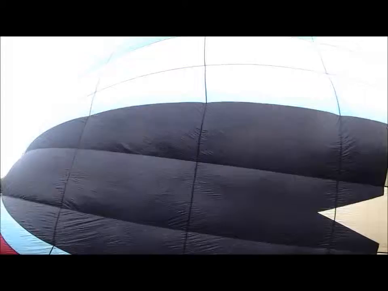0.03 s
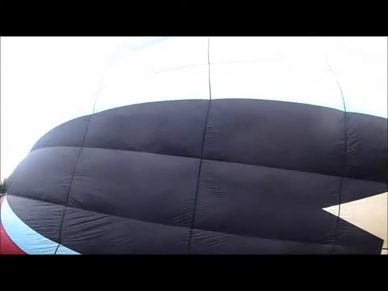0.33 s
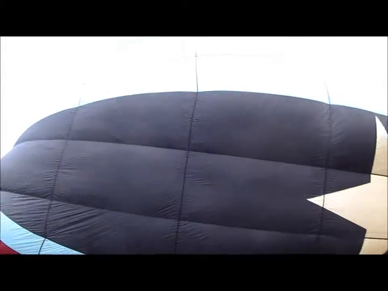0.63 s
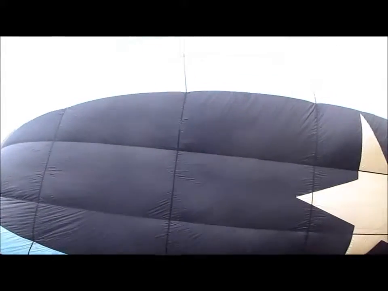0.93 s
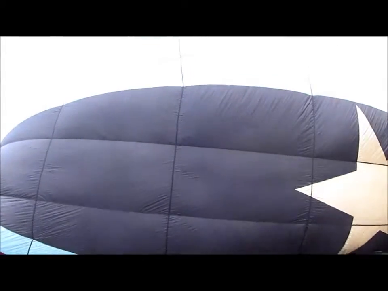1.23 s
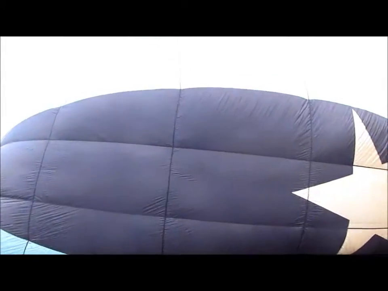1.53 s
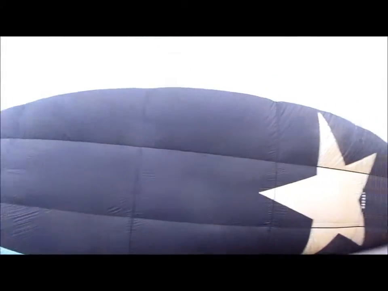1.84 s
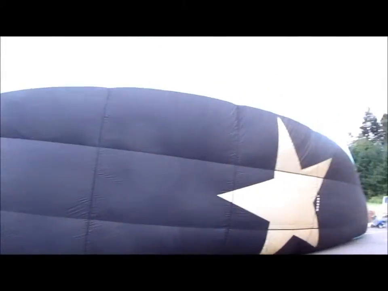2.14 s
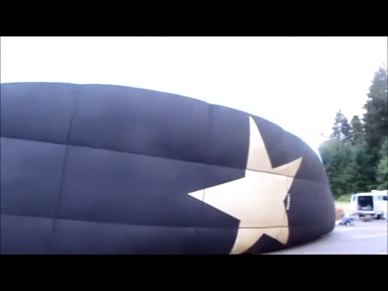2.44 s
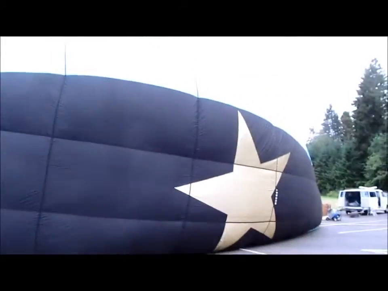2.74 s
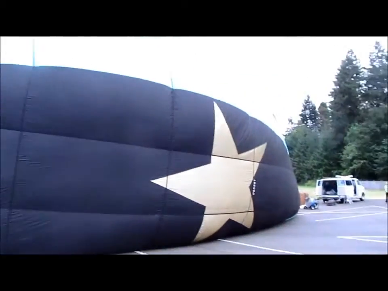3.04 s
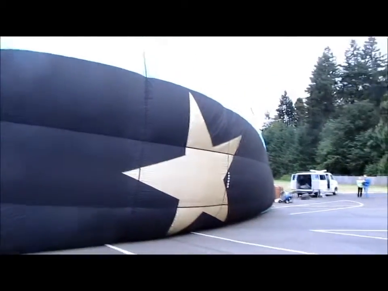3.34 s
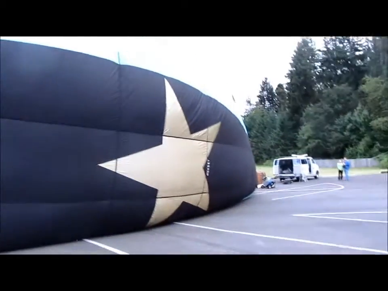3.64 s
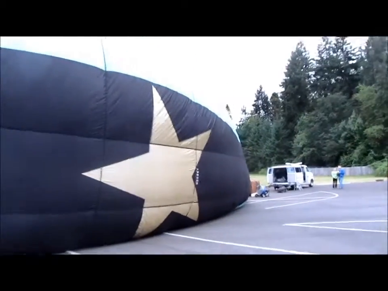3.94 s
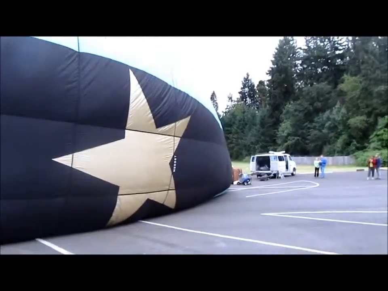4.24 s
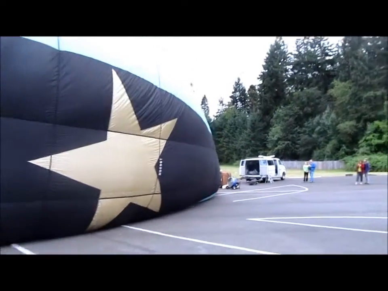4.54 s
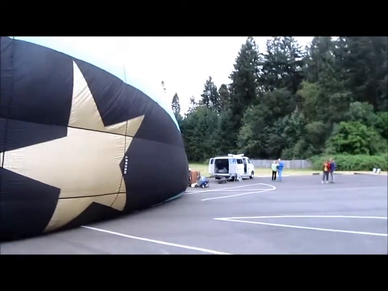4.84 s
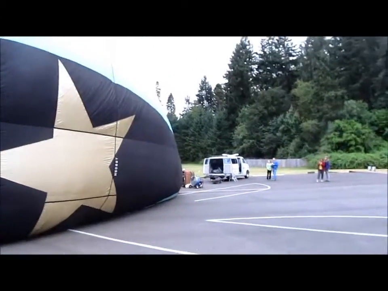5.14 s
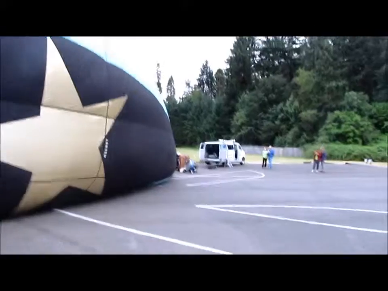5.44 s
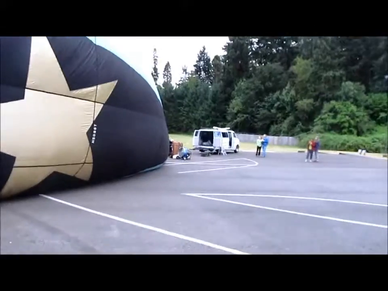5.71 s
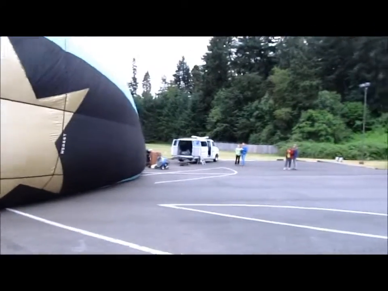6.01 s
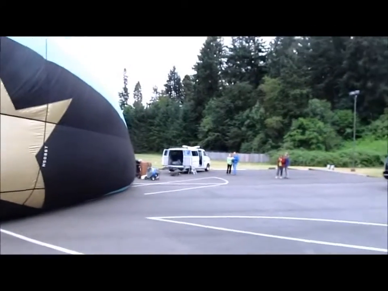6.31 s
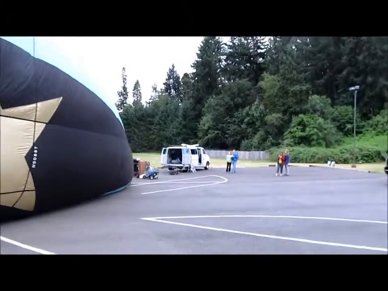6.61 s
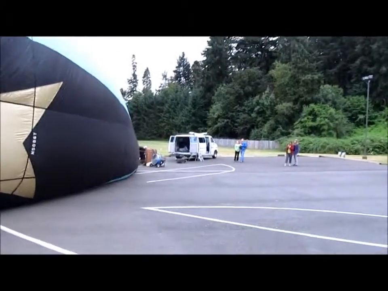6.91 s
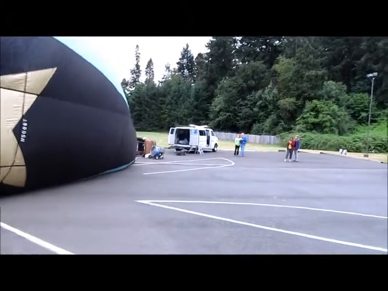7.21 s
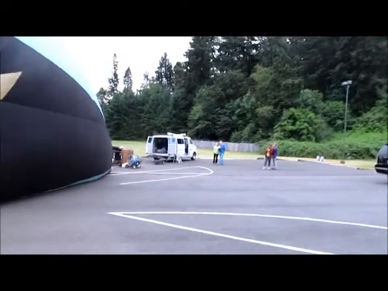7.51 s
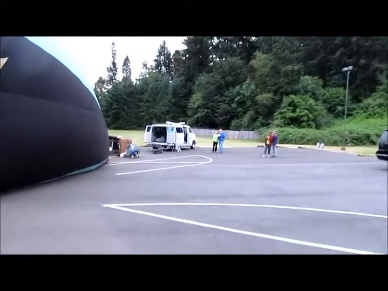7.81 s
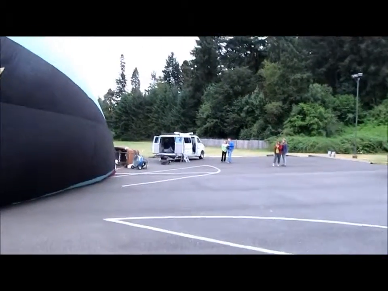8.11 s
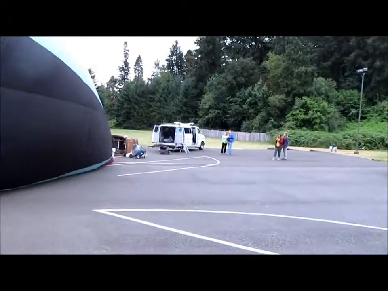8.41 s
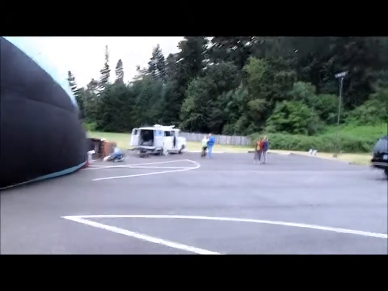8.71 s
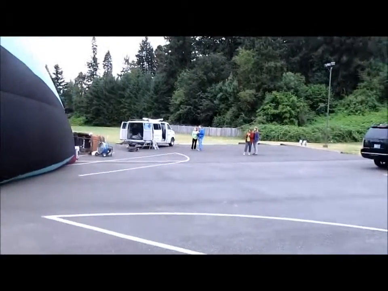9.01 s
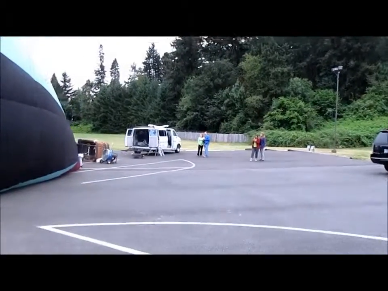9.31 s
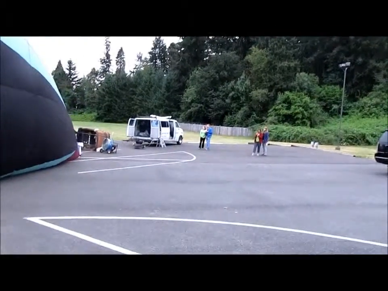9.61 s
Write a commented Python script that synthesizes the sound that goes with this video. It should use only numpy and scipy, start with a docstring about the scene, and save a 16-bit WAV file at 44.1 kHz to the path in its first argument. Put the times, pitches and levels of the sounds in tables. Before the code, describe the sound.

A petrol-driven fan fades in and roars steadily across a paved lot, with a thin whine and light engine clatter.

```python
"""A paved lot, some way off from a petrol-driven fan blowing cold air into a balloon on the ground.
The blades roar, a thin whine rides on top, and the one-cylinder four-stroke engine drones and clatters.
Another motor's hum sinks toward the engine's own, so their fast flutter slows to a deep throb.
The sound fades in while the stereo microphone turns: the fan moves from the shaded right to the open
left, and the echo off the pavement colours it."""
import sys
import numpy as np
from scipy import signal
from scipy.fft import rfft, irfft, next_fast_len
from scipy.io import wavfile

SR = 44100
rng = np.random.default_rng(int(sys.argv[2]) if len(sys.argv) > 2 else 0)


def digitize_waveform(pressure):
    """Quantize a signal to 16-bit integers and store it at the path in sys.argv[1].

    Rows of a 2-D input are taken as channels; values are limited to [-1, 1].
    """
    field = np.atleast_2d(pressure).T
    bounded = np.clip(field, -1, 1)
    quanta = np.round(bounded * 32767).astype(np.int16)
    wavfile.write(sys.argv[1], SR, quanta)


N = 429975
TIME_S = np.arange(N) / SR
FIRING_HZ = 24.06


def from_db(db):
    """Decibels to gain."""
    return 10 ** (np.asarray(db) / 20)


def rms_one(x):
    """Scale to unit power."""
    return x / np.sqrt(np.mean(x ** 2) + 1e-20)


def at_hz(points, hz):
    """Every column of a spectrum, joined on a log-frequency axis."""
    knots, *columns = np.transpose(points)
    return [np.interp(np.log(hz + 1), np.log(knots), column) for column in columns]


def at_time(points, time_s):
    """Every column of a timeline, joined by straight lines."""
    knots, *columns = np.transpose(points)
    return [np.interp(time_s, knots, column) for column in columns]


def drift(rate_hz):
    """A random wander of spread 1, changing about rate_hz times a second."""
    step, settle = 40, 2000
    pole = np.exp(-2 * np.pi * step * rate_hz / SR)
    noise = rng.standard_normal(N // step + settle + 2)
    slow = signal.lfilter([1], [1, -2 * pole, pole * pole], noise)[settle:]
    return np.interp(np.arange(N) / step, np.arange(len(slow)), rms_one(slow))


def resonate(x, hz, width_hz):
    """One resonance with gain 1 at its peak."""
    radius = np.exp(-np.pi * width_hz / SR)
    feedback = [1, -2 * radius * np.cos(2 * np.pi * hz / SR), radius ** 2]
    return signal.lfilter(np.array([1, 0, -1]) * (1 - radius ** 2) / 2, feedback, x)


def turbulence(spectrum):
    """Coloured stereo noise of rms 1; scattered sound sets the two channels apart."""
    # likeness of left and right: frequency_hz, likeness_ratio
    likeness = [(30, .35), (75, 0.87), (140, 0.97), (400, 0.98), (700, 1), (1300, 0.94), (2200, 0.69),
                (4000, 0.66), (9000, 1), (14000, 1)]
    size = next_fast_len(N)
    hz = np.arange(size // 2 + 1) * SR / size
    mid, side = rfft(rng.standard_normal((2, size)))
    alike = np.clip(at_hz(likeness, hz)[0], 0, 1)
    stereo = np.sqrt(1 + alike) * mid + np.sqrt(1 - alike) * side * [[1], [-1]]
    return rms_one(irfft(stereo * from_db(at_hz(spectrum, hz)[0]), size)[:, :N])


def partials(turns, harmonics, scatter_rad, waver_db):
    """Harmonics of a rotation, loosely in step, each wavering in the moving air."""
    out = np.zeros(N)
    for order, level_db in harmonics:
        angle = 2 * np.pi * round(order) * turns + scatter_rad * rng.standard_normal()
        out += np.sqrt(2) * from_db(level_db + waver_db * drift(1.23)) * np.cos(angle)
    return out


def fade(start_s=0.071, rise_s=4.4, top_db=0.22, ease_db_per_s=0.2646):
    """Gain over time: the sound fades in, then eases off very slowly."""
    age_s = TIME_S - start_s
    rise = np.clip(age_s / rise_s, 1e-4, 1) ** 0.68
    return rise * from_db(top_db - ease_db_per_s * np.maximum(age_s - rise_s, 0))


def blade_roar(cycle, whine_turns):
    """Torn air rings in the shroud, surges with the inflow and flutters with the shaft and the whine."""
    # air torn by the blades: frequency_hz, density_db
    roar_spectrum = [(25, -39), (60, -29), (110, -20), (250, -7.5), (300, -6.5), (350, -4), (440, -6),
                     (560, -2.5), (700, -0.5), (860, -3.3), (970, -5), (1100, -4), (1240, -4.2), (1400, -6),
                     (1800, -9), (2400, -14.5), (3800, -14.5), (4500, -18.5), (5000, -21), (6200, -25),
                     (9000, -28), (14500, -49)]
    # swells in the moving air: peak_s, length_s, boost_db
    swells = [(5.75, 0.75, 1.35), (6.65, 0.27, 0.8)]
    air = turbulence(roar_spectrum)
    shroud = 0.69 * resonate(air, hz=538, width_hz=26)
    swell_db = sum(boost_db * np.cos(np.pi * np.clip((TIME_S - peak_s) / length_s, -0.5, 0.5)) ** 2
                   for peak_s, length_s, boost_db in swells)
    surge = from_db(swell_db + 0.31 * drift(4.0) + 0.27 * drift(52))
    shaft_turns = 2 * cycle
    flutter = 1 + 0.018 * np.cos(2 * np.pi * shaft_turns) + 0.054 * np.cos(2 * np.pi * whine_turns)
    return from_db(-35.5) * (air + shroud) * surge * flutter


def thin_whine(turns):
    """A nearly steady tone that keeps its own pitch above the engine."""
    # partials of the whine: harmonic_number, level_db
    harmonics = [(1, -54.5), (3, -71), (4, -55.5), (5, -64)]
    return partials(turns, harmonics, scatter_rad=1.7, waver_db=2.5)


def stroke(cycle, start_cycles, rise_s, decay_s, uneven_db):
    """The envelope of one burst per engine cycle, each of its own strength; rms 1."""
    turns = cycle - start_cycles + 2
    age_s = turns % 1 / FIRING_HZ
    strength = from_db(uneven_db * rng.standard_normal(N // 1000))
    return rms_one(strength[turns.astype(int)] * (1 - np.exp(-age_s / rise_s)) * np.exp(-age_s / decay_s))


def exhaust_drone(cycle, lag_cycles=0.04):
    """Exhaust pulses, each just behind the valve tap, merge into a drone."""
    # partials of the firing rate: harmonic_number, level_db
    harmonics = [(2, -75.5), (3, -73.5), (4, -71.5), (6, -58), (7, -58), (8, -63.5), (9, -53.5), (10, -56),
                 (12, -50), (13, -71), (15, -63), (16, -60.5), (19, -57.5), (20, -63), (22, -53), (23, -59),
                 (24, -60.5), (25, -58.5)]
    return partials(cycle - lag_cycles, harmonics, scatter_rad=0.89, waver_db=0.84)


def silencer_puffs(cycle, ring_hz=195.0, width_hz=25.4):
    """Each firing sends a puff of gas ringing through the silencer."""
    gas = rng.standard_normal(N)
    puffs = gas * stroke(cycle, start_cycles=-0.2, rise_s=0.0032, decay_s=0.0088, uneven_db=2.5)
    ring = resonate(resonate(puffs, ring_hz, width_hz), ring_hz, width_hz)   # twice, for steep flanks
    return from_db(-51.0) * rms_one(ring)


def valve_clatter(cycle):
    """Two bright bursts a cycle: the exhaust valve, then the weaker, more uneven inlet valve."""
    # valve gear and cooling fins: frequency_hz, density_db
    clatter_spectrum = [(2500, -21), (4200, -8), (5000, 4), (6200, -3), (9000, -3), (11000, -10.5),
                        (14500, -22)]
    exhaust = stroke(cycle, start_cycles=-0.033, rise_s=0.002, decay_s=0.0088, uneven_db=1.5)
    inlet = stroke(cycle, start_cycles=0.34, rise_s=0.002, decay_s=0.0074, uneven_db=7.0)
    return from_db(-57.0) * turbulence(clatter_spectrum) * (exhaust + 0.27 * inlet)


def casing_rattle(cycle):
    """The engine casing rattles with each firing."""
    # the shaken engine casing: frequency_hz, density_db
    rattle_spectrum = [(500, -45), (1200, -12), (1900, 0.5), (2600, -4), (3700, -1.5), (4600, -11),
                       (6500, -26), (12000, -50)]
    rattle = from_db(-53.5) * turbulence(rattle_spectrum)
    return rattle * stroke(cycle, start_cycles=-0.064, rise_s=0.0022, decay_s=0.023, uneven_db=1.5)


def valve_ticks(cycle, final_db=-42, uneven_db=3, growth_db_per_s=0.9):
    """The valve taps once a cycle, now and then hard; each tap strikes every mode with its own strength."""
    # taps that stand out: time_s, level_db
    hard_taps = [(6.4737, -39), (6.6398, -41), (6.8468, -38), (7.2609, -40), (7.5931, -37), (7.6755, -37),
                 (8.1743, -38), (8.3, -38), (8.3419, -33), (8.4248, -40), (8.5086, -37), (8.8827, -39),
                 (9.0069, -40), (9.0478, -37), (9.0902, -36), (9.1726, -42), (9.4639, -35), (9.5487, -36),
                 (9.5886, -40)]
    # ring of the tapped metal: pitch_hz, level_db, t60_s
    modes = [(4700, -9.5, 0.02), (4900, -6.5, 0.028), (5190, -8.5, .022), (6100, -13.5, .024)]
    tap_at = np.flatnonzero(np.diff(np.floor(cycle)) > 0)
    count = len(tap_at)
    tap_db = final_db + uneven_db * rng.standard_normal(count) + growth_db_per_s * (tap_at - N) / SR
    for time_s, level_db in hard_taps:
        tap_db[np.argmin(abs(tap_at / SR - time_s))] = level_db
    out = np.zeros(N)
    for pitch_hz, mode_db, t60_s in modes:
        strength = from_db(tap_db + mode_db + 1.9 * rng.standard_normal(count))
        taps = np.full(N, 1e-18)
        taps[tap_at] = strength * rng.choice([-1, 1], count)
        radius, angle = from_db(-60 / (t60_s * SR)), 2 * np.pi * pitch_hz / SR
        out += signal.lfilter([0, np.sin(angle)], [1, -2 * radius * np.cos(angle), radius ** 2], taps)
    return out


def engine(cycle):
    """Everything the firings drive, emerging a little later than the roar."""
    exhaust = exhaust_drone(cycle) + silencer_puffs(cycle)
    metal = valve_clatter(cycle) + casing_rattle(cycle) + valve_ticks(cycle)
    return (exhaust + metal) * fade() ** 0.1


def beating_hums(cycle, harmonic=5, cancel_s=8.7):
    """Another motor's hum sinks toward the engine's deep hum, so the beat between them slows."""
    # the other motor on the lot: time_s, above_engine_hum_hz, level_db
    other_motor = [(3.2, 9, -74), (3.9, 8.4, -67), (4.8, 5.57, -67), (6.5, 7.2, -66), (7.1, 6.1, -61),
                   (7.5, 4.5, -61), (7.95, 2.28, -58.5), (8.45, 1.84, -54), (8.7, 1.4, -57.5),
                   (9.15, .75, -56.5), (9.75, 2, -58)]
    above_hz, other_db = at_time(other_motor, TIME_S)
    beats = np.cumsum(above_hz) / SR
    beats -= np.interp(cancel_s, TIME_S, beats)   # the hums are in opposite phase at cancel_s
    turns = harmonic * cycle
    own = from_db(-58) * fade() ** 1.46 * np.cos(2 * np.pi * turns)
    other = from_db(other_db) * fade() * np.cos(2 * np.pi * (turns + beats))
    return np.sqrt(2) * (own - other)


def turning_microphone(sound, shade_lag_ms=0.15, lag_top_hz=11500, shade_width=0.25):
    """The pavement echo combs the sound; turning shades and delays it differently at the two ports."""
    # the turn, shade 1 facing away from the fan and 0 open to it: time_s, shade_ratio, echo_delay_ms
    turn = [(0.202, 0.77, 1.38), (1.6, .72, 1.52), (3.2, 0.39, 1.74), (4.4, 0.22, 1.78), (5.1, 0.078, 1.76),
            (5.9, 0.0043, 1.8), (6.25, 0.019, 1.71), (7.3, -0.08, 1.775), (8, -0.099, 1.7),
            (8.55, -0.12, 1.73), (8.85, -0.2, 1.6), (9.6, -0.18, 1.62)]
    # pavement echo at each port: frequency_hz, left_gain, right_gain
    echo = [(300, 0.37, 0.35), (850, 0.25, 0.35), (1200, 0.15, .22), (1400, .15, 0.59), (1550, .13, 0.65),
            (1700, 0.13, .22), (1920, .08, 0.42), (2220, 0.097, 0.31), (2510, .08, 0.07), (2900, .03, .02)]
    # balance of the ports facing the open lot: frequency_hz, left_minus_right_db
    port_balance = [(400, -0.5), (750, -0.1), (1000, 2), (1250, 2.5), (1450, 2), (1700, 3.5), (1950, -0.5),
                    (2450, -3.5), (3300, 7.5), (4600, 13), (6500, 6), (8500, 3.5), (12000, 0)]
    # phase between those ports: frequency_hz, left_lead_rad
    port_phase = [(100, -0.015), (400, 0.055), (860, 0.42), (1380, 0.46), (1680, -0.17), (2070, -0.09),
                  (2760, 1.2), (3300, 1.23), (5100, -0.4), (7000, -0.56)]
    # change when turned fully away: frequency_hz, left_db, right_db
    shadow = [(80, 0.5, 0.5), (189, -3.5, -4), (342, 3, 1.5), (430, -6, -5), (540, -6, -5.5),
              (784, -1.5, -4), (1110, -3.5, -2.5), (1410, -5.5, -0.3), (1780, -4.5, -4.5), (2560, -5.5, -4),
              (4630, -10.5, -0.5), (5900, -5, 8), (8800, -15, -4), (11700, -3.5, 1.5), (14000, -8, -8)]
    # narrow peaks and dips in the fan's tone that shift as the microphone turns:
    # centre_hz, half_width_hz, left_db, right_db, strongest_shade_ratio, glide_hz_per_shade
    turning_peaks_and_dips = [(436, 22, 0, -1, .78, 0), (1070, 37, 2.5, .9, .61, -84),
                              (1380, 42, 3, -0.5, 0.58, 26), (1440, 40, 0.5, -8, 0.1, 0),
                              (1580, 63, 3.5, -1, 0.84, 467), (1915, 110, 6, -0.5, 0.087, -181),
                              (1900, 93, -8, 1.5, 0.75, 962), (1945, 160, 5.9, 0, .6, -402),
                              (2160, 67, -7, 4, 0.47, 456), (2240, 65, -2, -6.5, 0.66, 700),
                              (2470, 54, -6, -3.5, 0.4, 303), (2520, 220, 10.5, 3, 0.61, 512),
                              (2640, 130, 2, 5.5, 0.31, 92), (2090, 75, -0.5, 2, 0.21, 0),
                              (3500, 166, 0, 0.5, 0.55, -245), (4589, 235, -1, 3, 0.69, 62),
                              (5800, 300, -8.5, 4, 0.31, 317), (5950, 350, 0.5, -3, 0.82, 0),
                              (5070, 400, -3.5, -1, 0.43, 0), (7430, 1400, 10.5, -0.3, 0.35, 158)]
    hz, frame_s, frames = signal.stft(sound, SR, nperseg=1024)
    hz = hz[:, None]
    shade, echo_ms = at_time(turn, frame_s)
    rad_per_ms = 2 * np.pi * hz / 1000
    pavement = 1 + np.clip(at_hz(echo, hz), 0, 0.9) * np.exp(-1j * rad_per_ms * echo_ms)
    sides = np.array([0.5, -0.5])[:, None, None]
    colour_db = sides * at_hz(port_balance, hz)[0] + shade * np.array(at_hz(shadow, hz))
    for centre_hz, half_width_hz, left_db, right_db, strongest_shade, glide_hz in turning_peaks_and_dips:
        shade_offset = shade - strongest_shade
        detune = (hz - centre_hz - glide_hz * shade_offset) / half_width_hz
        shape = np.exp(-(shade_offset / shade_width) ** 2) / (1 + detune ** 2)
        colour_db += np.array([left_db * shape, right_db * shape])
    lag_rad = rad_per_ms * shade * shade_lag_ms * np.minimum(1, lag_top_hz / (hz + 1))
    lead_rad = (1 - shade) * at_hz(port_phase, hz)[0] - lag_rad
    heard = frames * pavement * from_db(colour_db) * np.exp(1j * sides * lead_rad)
    return signal.istft(heard, SR)[1][:, :N]


def scene(first_firing_s=0.0294, wander_s=0.0004, jitter_s=0.00004, whine_hz=271.1):
    """The fan across the lot; its governor holds the engine speed within a fraction of a percent."""
    cycle = FIRING_HZ * (TIME_S - first_firing_s + wander_s * drift(0.77) + jitter_s * drift(8.9))
    whine_turns = np.cumsum(whine_hz * (1 + 0.001938 * drift(1.376))) / SR
    fan = thin_whine(whine_turns) + blade_roar(cycle, whine_turns) + engine(cycle)
    return fade() * turning_microphone(fan) + beating_hums(cycle)   # the hums are too low to be shaded


def record(dry, start_s=0.024, rise_s=0.11, notch_hz=7900, notch_width_hz=130, cutoff_hz=15100):
    """The sound opens from silence; the microphone has one narrow notch, and the top is cut."""
    opening = np.clip((TIME_S - start_s) / rise_s, 0, 1) ** 2
    notch = signal.iirnotch(notch_hz, notch_hz / notch_width_hz, fs=SR)
    lowpass = signal.ellip(12, 0.1, 80, cutoff_hz, fs=SR, output="sos")
    return signal.sosfilt(lowpass, signal.lfilter(*notch, dry * opening))


dry = scene()
out = record(dry)
digitize_waveform(out)
```